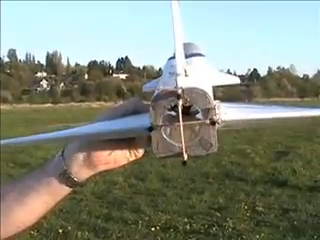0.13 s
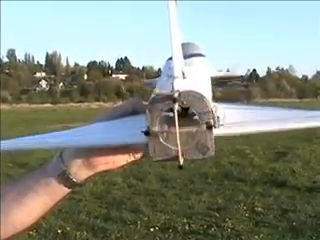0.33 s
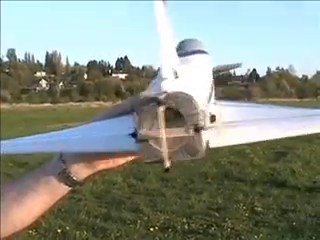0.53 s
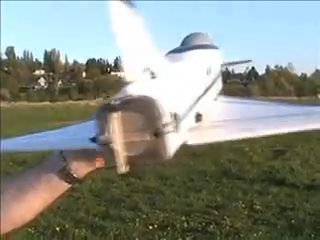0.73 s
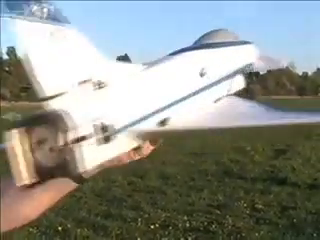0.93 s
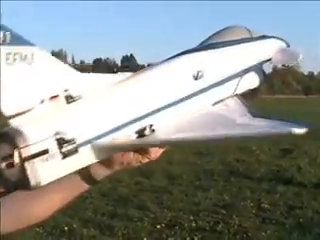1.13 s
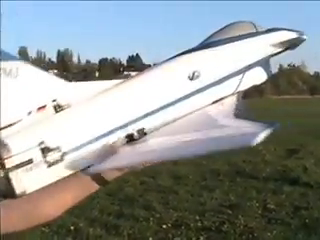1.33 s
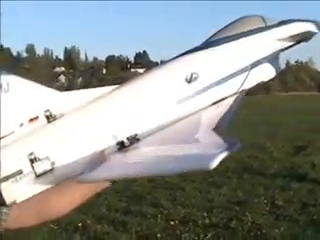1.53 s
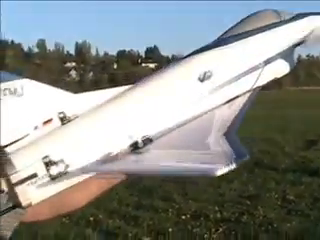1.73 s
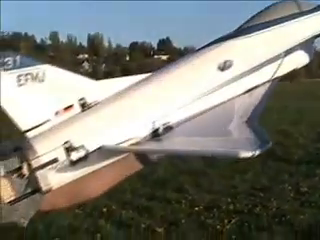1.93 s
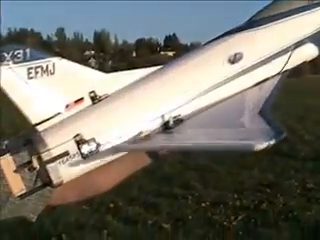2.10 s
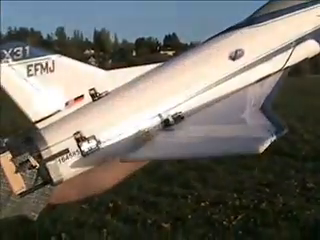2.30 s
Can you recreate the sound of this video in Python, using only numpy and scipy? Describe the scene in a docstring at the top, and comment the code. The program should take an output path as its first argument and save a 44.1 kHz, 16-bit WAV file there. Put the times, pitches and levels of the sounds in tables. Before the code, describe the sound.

Small servos in a model aircraft whir close by in six short bursts, each a throbbing gear whine with a rattle. The first comes right at the start, the others at about 0.4, 0.8, 1.2, 1.7 and 2.2 seconds, each lasting around a fifth of a second and growing slightly louder. Sharp little gear clicks fill the gaps. Faint distant outdoor noise, hum and fine ticking continue underneath.

```python
"""Model aircraft servos in a field.

Small servos in a hand-held model sweep its control surfaces six times: gear teeth rattle the case
and two gear stages whine. The receiver pulses the motors, so each whir throbs; between sweeps the
gears twitch. Under it lie a camera's ticking drive and distant wash, heard by two close mic ports."""
import sys
import numpy as np
from scipy import signal
from scipy.fft import rfft, irfft
from scipy.io import wavfile
from scipy.ndimage import uniform_filter1d

SR = 44100
rng = np.random.default_rng(int(sys.argv[2]) if len(sys.argv) > 2 else 0)


def to_wav(sig):
    """Store sig (one row per channel, or 1-D mono) as 16-bit WAV at the path in sys.argv[1].

    Samples outside -1..1 are clipped; the rate is SR.
    """
    pcm = np.clip(np.atleast_2d(sig), -1, 1) * 32767
    pcm = np.round(pcm).astype(np.int16)
    wavfile.write(sys.argv[1], SR, pcm.T)  # frames by channels


N = 104120

# Gear load, one curve per sweep: time_s, level_db, mesh_re_rattle_db, low_re_rattle_db
SWEEP_CURVES = [
    [(0.0, -27, -11.5, -17.5), (0.042, -26.5, -23, -31), (0.05, -29, -4, -23), (0.08, -28.5, -14, -35),
     (0.106, -36, -21, -16), (0.118, -50.5, -4, -14), (0.125, -39, -2, -25)],
    [(0.345, -53, 6, -7), (0.357, -27, -25, -28), (0.405, -25.5, -12.5, -15.5), (0.445, -25.5, -16, -10),
     (0.497, -24.5, -19, -10.5), (0.521, -27.5, -10.5, -19), (0.535, -28, -21, -19), (0.545, -45, -9, -11),
     (0.55, -39.5, -8, -7)],
    [(0.78, -45, -26, 4), (0.792, -51.5, -21, -7), (0.804, -28.5, -29, -28), (0.844, -24, -9, -32),
     (0.978, -21.5, -19, -30), (1.006, -25, -17, -33), (1.014, -29.5, -16, -19), (1.04, -59, -27, -4)],
    [(1.2, -36, -12, -23), (1.208, -28.5, -8, -41), (1.226, -32, -9, -23), (1.232, -22.5, -10, -25),
     (1.27, -22, -8, -23.5), (1.3, -21.5, -3.5, -20.5), (1.375, -22, -4, -20.5), (1.414, -24, -11, -28),
     (1.422, -36, -19, -32), (1.43, -32.5, -4, -22)],
    [(1.696, -51, -7, -15), (1.702, -26, -18, -27), (1.716, -40, -11, -16), (1.724, -25.5, -11, -21),
     (1.74, -25, -30, -34), (1.748, -22, -38, -33), (1.785, -22.5, -11, -24.5), (1.81, -22, -5.5, -22.5),
     (1.898, -22, -9, -23), (1.928, -29.5, -19, -24), (1.94, -39.5, -7, -28)],
    [(2.143, -48, -4, -22), (2.155, -23, -22, -25), (2.205, -21, -8, -20), (2.25, -21, -6.5, -18.5),
     (2.268, -20.5, -13, -19), (2.284, -19, -18, -9), (2.319, -22.5, -5, -22), (2.337, -25.5, -17, -33),
     (2.343, -35.5, -13, -11), (2.36, -35.5, -15, -22)],
]
# Motor, per sweep: spin_start_s, mesh_hz, mesh_sag_ratio, low_hz, low_sag_ratio, spin_up_s,
# pulse_lead_s, low_lag_s, side_on_share, treble_db
SWEEP_MOTORS = [(-.05, 1160, .18, 464, 0.35, 0.024, 0.00079, 0.0073, 0.061, 3),
                (.36, 1237, 0.11, 490, .26, 0.0351, 0.001, 0.012, 0.43, 1.5),
                (0.8, 1259, 0.07, 489, 0.26, .04, 0.0034, 0.0094, 0.25, 3),
                (1.202, 1327, 0.11, 490, .15, 0.036, 0.0013, 0.004, 0.74, 1),
                (1.75, 1281, .06, 470, 0.3, 0.0887, 0.004, 0.0095, 0.81, 2),
                (2.152, 1372, 0.15, 506, 0.07, 0.046, .0015, 0.0094, 0.86, -0.5)]
# Case and airframe resonances: freq_hz, width_hz, gain_db per sweep
CASE_MODES = [(1910, 70, [3, 4, -27, -17, -3, -3]), (2173, 83, [-13, -14, -9, 1, -1.5, -11]),
              (2300, 105, [-10, -13, -8, -15, -1, -2]), (2686, 180, [-5, -7, -1, -18, -3, -18]),
              (3250, 68, [-2, 1, -16, -19, -24, -9]), (3524, 130, [-11, -1, 0, -5, 2, 0.5]),
              (3870, 74, [3.5, 1, 2, -2, -8, -3]), (4490, 50, [-24, -5, -13, 7.5, -26, -30]),
              (5110, 180, [-23, -16, -5, -15, -6, -17]), (5760, 67, [-4, -12, 4.5, -5, -22, -12]),
              (8540, 46, [-17, -15, 1, -25, -15, -15])]
# Rattle spectrum, tail-on and side-on: freq_hz, gain_db
TAIL_ON_EQ = [(300, -17.5), (600, -9), (900, -9.5), (1500, -5.5), (2000, -1), (3300, -2), (5600, -3.5),
              (6800, -11.5), (8300, -14), (11000, -22.5)]
SIDE_ON_EQ = [(300, -19), (600, -12.5), (900, -0.5), (1500, 2.5), (2200, -0.5), (3100, -2), (4500, -2),
              (5600, -0.5), (6800, -13), (8300, -11.5), (11000, -24.5)]
# Gear jerks: start_s, level_db, ring_hz, ring_re_snap_db
GEAR_TWITCHES = [(0.1266, -25, 2020, -8), (0.1494, -24.5, 1990, -5), (0.1757, -36.5, 1230, -3),
                 (0.5541, -23, 3750, -12), (0.5722, -28, 3230, 2), (0.5784, -24.5, 3880, -2),
                 (0.624, -23, 2820, -1), (0.6388, -31.5, 3500, 7), (0.6844, -32, 3130, 2),
                 (0.6909, -25.5, 4040, -2), (0.7728, -34, 3830, -5), (1.043, -26, 4560, -7),
                 (1.0677, -28, 5000, -1), (1.1627, -24, 4680, 4.5), (1.1786, -30, 1280, -12),
                 (1.1862, -31, 2480, -15), (1.4334, -17.5, 1365, 1), (1.449, -27, 1420, -7),
                 (1.456, -26, 2840, -5), (1.4731, -23, 1870, -2), (1.4798, -25.5, 1320, -6),
                 (1.494, -20.5, 3960, -1), (1.501, -28, 2840, 0), (1.515, -23.5, 2000, 2),
                 (1.5385, -26.5, 1210, -6), (1.5469, -26, 2820, -17), (1.583, -37, 2520, -8),
                 (1.6372, -26.5, 3900, -12), (1.9471, -18, 1370, -1), (1.9681, -24.5, 1296, 5),
                 (1.9936, -28, 1285, 3), (2.0585, -28, 2380, 2), (2.08, -28, 2410, 5),
                 (2.1298, -23.5, 1300, 0), (2.137, -30.5, 3040, 6)]
# Snap spectrum: freq_hz, gain_db
SNAP_EQ = [(900, -5), (1500, -3.5), (2500, -3.5), (4700, -3.5), (6500, -11.5), (9000, -18.5), (11500, -28)]
# Ticks of one drum turn: accent_db
TICK_ACCENTS_DB = [-2, 8, 2, 6, -38]
# Tick resonances: freq_hz, width_hz, gain_db
TICK_MODES = [(4840, 260, 0), (5140, 390, -1)]
# Drum hum: harmonic_number, level_db
HUM_PARTIALS = [(1, -52.5), (2, -62), (3, -70), (8, -80), (11, -59), (12, -92), (14, -88), (15, -66.5)]
# Wash spectrum, mid and side: freq_hz, gain_db
WASH_MID_EQ = [(25, -38), (50, -5), (100, 2), (200, -2), (310, -12), (500, -1), (900, -4), (1400, -13),
               (2500, -25), (4000, -20.5), (5000, -15), (6300, -32), (10500, -33.5), (11800, -47)]
WASH_SIDE_EQ = [(25, -25), (50, 2.5), (110, 0), (200, -18.5), (400, -17.5), (700, -22.5), (1800, -33.5),
                (3500, -39), (4700, -26), (6800, -42), (11800, -39)]
# Wash mid-side link at 90 degrees: freq_hz, coherence
WASH_LINK = [(25, 0.38), (100, 0.92), (200, 0.69), (400, 0.095), (11000, .05)]
# Likeness of the ports: freq_hz, coherence
PORT_COHERENCE = [(300, .97), (1200, .997), (3000, .95), (6000, .88), (11000, .6)]
# Port phase: freq_hz, left_lead_rad
PORT_PHASE = [(300, .1), (700, .05), (1300, -.08), (2240, -.45), (4480, -.75), (6890, -1.6), (9220, -1.6),
              (11400, -3)]
# Port balance: freq_hz, left_minus_right_db
PORT_TILT = [(600, 0), (2000, -1.2), (5000, -.6), (9000, -2.7)]

PULSE_PERIOD_S, FIRST_PULSE_S, PULSE_RISE_SHARE = .0225, .0115, .25
RATTLE_THROB_DB, START_THROB_DB, WHINE_THROB_DB = 4, -1, 11
SURGE_RATIO, MESH_LAG_S, COAST_DB_PER_S, CLEAN_SHARE = .035, .004, 1500, .66
TEETH_PER_S, TOOTH_SPREAD_DB, HISS_GAIN = 5000, 1.04, 0.4
TWITCH_RISE_S, TWITCH_FALL_S, TWITCH_TAIL_S, TWITCH_TAIL_DB = .0027, .0017, .018, -21
DRUM_HZ, FIRST_TICK_S, TICK_LEVEL_DB, TICK_SPREAD_DB = 59.94, .0045, -59.5, 5.5
WASH_MID_DB, WASH_SIDE_DB, HUM_SIDE_DB, SIDE_SKEW = -46.5, -45.5, 2.5, .25


def servo_sweep(curve, motor, modes):
    """Case rattle and two gear stages whining up to speed, all pushed by the drive pulses."""
    (spin_start_s, mesh_hz, mesh_sag, low_hz, low_sag, spin_up_s,
     lead_s, low_lag_s, side_on, treble_db) = motor
    time_s, *levels_db = np.transpose(curve)
    t = time_s[0] + np.arange(SR // 3) / SR
    level_db, mesh_db, low_db = (np.interp(t, time_s, db) for db in levels_db)
    pulse_t = t + lead_s
    slow = np.exp(-np.maximum(t - spin_start_s, 0) / spin_up_s)
    speed = 1 + SURGE_RATIO * drive_pulse(pulse_t - PULSE_PERIOD_S / 2)
    rattle = case_rattle(len(t), modes, side_on, treble_db)
    rattle *= amp((RATTLE_THROB_DB + START_THROB_DB * slow) * drive_pulse(pulse_t))
    mesh = gear_whine(mesh_hz * (speed - mesh_sag * slow), width_hz=130, wobble_ratio=.012)
    mesh *= amp(mesh_db + WHINE_THROB_DB * drive_pulse(pulse_t - MESH_LAG_S))
    low = gear_whine(low_hz * (speed - low_sag * slow), width_hz=65, wobble_ratio=.025)
    low *= amp(low_db + WHINE_THROB_DB * drive_pulse(pulse_t - low_lag_s))
    attack = np.minimum((t - time_s[0]) / .00054, 1)
    coast_db = COAST_DB_PER_S * np.maximum(t - time_s[-1], 0)
    return time_s[0], (rattle + mesh + low) * amp(level_db - coast_db) * attack


def drive_pulse(t):
    """Motor push: fast rise, slow fall, -0.5 to 0.5."""
    phase = (t - FIRST_PULSE_S) / PULSE_PERIOD_S % 1
    return np.minimum(phase / PULSE_RISE_SHARE, (1 - phase) / (1 - PULSE_RISE_SHARE)) - .5


def case_rattle(size, modes, side_on, treble_db):
    """Tooth clicks ring case and airframe; the aircraft's angle sets the colour."""
    teeth = gear_teeth(size)
    body = teeth + sum(amp(db) * resonate(teeth, hz, width_hz) for hz, width_hz, db in modes)
    body = colour(body, [(20, 0), (5500, 0), (7000, treble_db), (20000, treble_db)])
    return unit_rms((1 - side_on) * colour(body, TAIL_ON_EQ) + side_on * colour(body, SIDE_ON_EQ))


def gear_teeth(size):
    """Two independent streams of uneven tooth clicks over hiss."""
    hits = rng.random((size, 2)) < TEETH_PER_S / SR
    force = amp(TOOTH_SPREAD_DB * np.minimum(rng.exponential(1, (size, 2)), 4))
    polarity = np.sign(rng.standard_normal((size, 2)))
    hiss = rng.standard_normal((size, 2))
    return (unit_rms(hits * force * polarity) + HISS_GAIN * hiss).T


def gear_whine(hz, width_hz, wobble_ratio):
    """Wavering gear tone: part sine, part narrow noise."""
    fuzz = resonate_twice(rng.standard_normal((2, len(hz))), hz, width_hz)
    drift = unit_rms(uniform_filter1d(rng.standard_normal(len(hz)), size=400))
    cycles = np.cumsum(hz * (1 + wobble_ratio * drift)) / SR
    tone = np.sin(2 * np.pi * (cycles + rng.random((2, 1))))
    return unit_rms(CLEAN_SHARE * unit_rms(tone) + (1 - CLEAN_SHARE) * unit_rms(fuzz))


def gear_twitch(level_db, ring_hz, ring_db):
    """One jerk of the gear train: broad snap, brief ring."""
    t = np.arange(SR // 20) / SR
    attack = np.minimum(t / TWITCH_RISE_S, 1)
    decay = np.exp(-t / TWITCH_FALL_S) + amp(TWITCH_TAIL_DB) * np.exp(-t / TWITCH_TAIL_S)
    snap = unit_rms(colour(gear_teeth(len(t)), SNAP_EQ))
    ring = unit_rms(resonate(snap, ring_hz, width_hz=770))
    ring += np.sin(2 * np.pi * (ring_hz * t + rng.random((2, 1))))
    return amp(level_db) * attack * decay * unit_rms(snap + amp(ring_db) * unit_rms(ring))


def drum_ticks(count=700):
    """The camera's tape drum ticks five times a turn, with a small bright ring."""
    spread_db = TICK_SPREAD_DB * rng.standard_normal((count, 2)).T
    tick_s = FIRST_TICK_S + np.arange(count) / DRUM_HZ / len(TICK_ACCENTS_DB)
    train = np.zeros((2, N + SR))
    train[:, np.round(tick_s * SR).astype(int)] = amp(np.resize(TICK_ACCENTS_DB, count) + spread_db)
    ring = sum(amp(db) * resonate_twice(train[:, :N], hz, width_hz) for hz, width_hz, db in TICK_MODES)
    return amp(TICK_LEVEL_DB) * unit_rms(ring)


def drum_hum():
    """Faint harmonics of the drum's turn; mid and side 90 degrees apart."""
    turns = DRUM_HZ * np.arange(N) / SR
    hum = sum(amp(db) * np.exp(2j * np.pi * (k * turns + rng.random())) for k, db in HUM_PARTIALS)
    return left_right(hum.real, amp(HUM_SIDE_DB) * hum.imag)


def field_wash():
    """Distant noise swelling in patches; the bass is out of phase between the ports."""
    frames, hz = N // 256 + 5, np.fft.rfftfreq(1024, 1 / SR)
    mid_re, mid_im, side_re, side_im, patches = rng.standard_normal((frames, 513, 5)).T
    patches = uniform_filter1d(uniform_filter1d(patches, size=10, axis=0), size=10, axis=1)
    patch_db = 1.36 * unit_rms(patches)
    link = np.clip(lookup(WASH_LINK, hz), 0, 1)[:, None]
    side = side_re + 1j * side_im
    mid = np.sqrt(1 - link ** 2) * (mid_re + 1j * mid_im) + 1j * link * side
    spectra = np.array([mid * amp(lookup(WASH_MID_EQ, hz))[:, None],
                        side * amp(lookup(WASH_SIDE_EQ, hz))[:, None]])
    mid, side = signal.istft(spectra * amp(patch_db), nperseg=1024, noverlap=768)[1][:, :N]
    return left_right(amp(WASH_MID_DB) * unit_rms(mid), amp(WASH_SIDE_DB) * unit_rms(side))


def mic_ports(pair):
    """Two close ports: mostly the same sound, phase-shifted and tilted."""
    hz = np.fft.rfftfreq(N, 1 / SR)
    left, unrelated = rfft(pair)
    coherence = np.clip(lookup(PORT_COHERENCE, hz), 0, 1)
    lead_rad = lookup(PORT_PHASE, hz)
    tilt = amp(lookup(PORT_TILT, hz) / 2)
    right = coherence * left * np.exp(-1j * lead_rad) + np.sqrt(1 - coherence ** 2) * unrelated
    mono_gain = np.sqrt(np.maximum(1 + coherence * np.cos(lead_rad), .2) / 2)
    return irfft(np.array([left * tilt, right / tilt]) / mono_gain, N)


def left_right(mid, side):
    """Mid-side to stereo, side stronger on the right."""
    return np.array([mid + (1 - SIDE_SKEW) * side, mid - (1 + SIDE_SKEW) * side])


def amp(db):
    """dB to gain."""
    return 10 ** (np.asarray(db) / 20)


def unit_rms(x):
    """Scale to rms 1."""
    return x / np.sqrt(np.mean(x ** 2) + 1e-20)


def lookup(points, hz):
    """Interpolate on a log frequency axis."""
    freq_hz, value = np.transpose(points)
    return np.interp(np.log(hz + 1), np.log(freq_hz + 1), value)


def colour(x, points):
    """Minimum-phase EQ, 12 dB/octave roll-off below the first point."""
    hz = np.abs(np.fft.fftfreq(2048, 1 / SR))
    db = lookup(points, hz) + 40 * np.log10(np.clip(hz / points[0][0], .01, 1))
    log_gain = np.log(amp(np.maximum(db, -100)))
    phase_rad = -signal.hilbert(log_gain).imag
    taps = np.fft.ifft(np.exp(log_gain + 1j * phase_rad)).real[:1024]
    return signal.oaconvolve(x, taps[None])[:, :x.shape[1]]


def resonate(x, hz, width_hz):
    """Unity-gain resonance, steady or gliding."""
    carrier = np.exp(2j * np.pi * np.cumsum(hz * np.ones(x.shape[-1])) / SR)
    pole = np.exp(-np.pi * width_hz / SR)
    return 2 * (carrier * signal.lfilter([1 - pole], [1, -pole], x / carrier)).real


def resonate_twice(x, hz, width_hz):
    """Two resonances in series for steeper skirts."""
    return resonate(resonate(x, hz, width_hz), hz, 2 * width_hz)


def add(mix, start_s, sound):
    """Mix in a stereo sound."""
    part = mix[:, round(start_s * SR):][:, :sound.shape[1]]
    part += sound[:, :part.shape[1]]


def scene():
    """Servos and ticks through the ports, over wash and hum."""
    servos = np.zeros((2, N))
    for k, (curve, motor) in enumerate(zip(SWEEP_CURVES, SWEEP_MOTORS)):
        modes = [(hz, width_hz, gains_db[k]) for hz, width_hz, gains_db in CASE_MODES]
        add(servos, *servo_sweep(curve, motor, modes))
    for start_s, level_db, ring_hz, ring_db in GEAR_TWITCHES:
        add(servos, start_s, gear_twitch(level_db, ring_hz, ring_db))
    return mic_ports(servos + drum_ticks()) + field_wash() + drum_hum()


def record(dry):
    """Steep low-pass at 11.2 kHz."""
    taps = signal.firwin(1023, 11200, window=("kaiser", 9), fs=SR)
    return signal.oaconvolve(dry, taps[None], "same")


dry = scene()
out = record(dry)
to_wav(out)
```